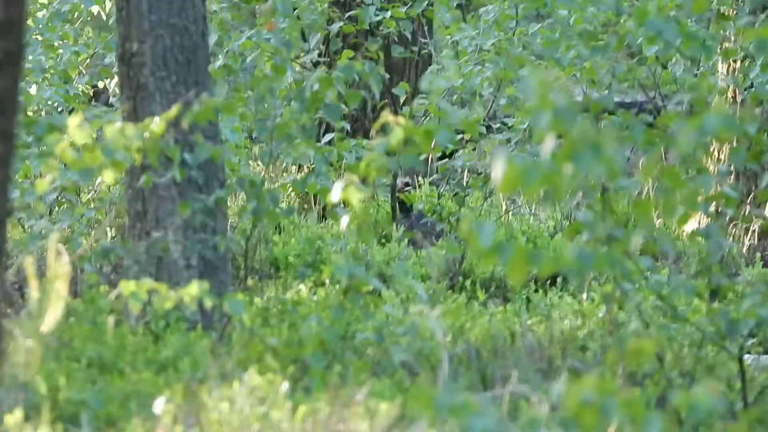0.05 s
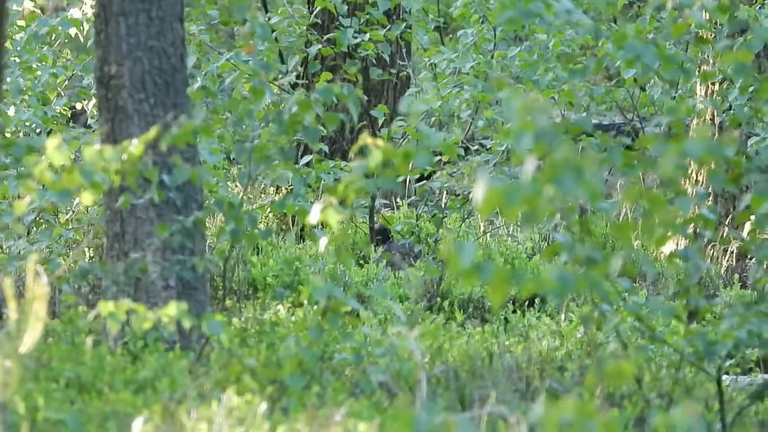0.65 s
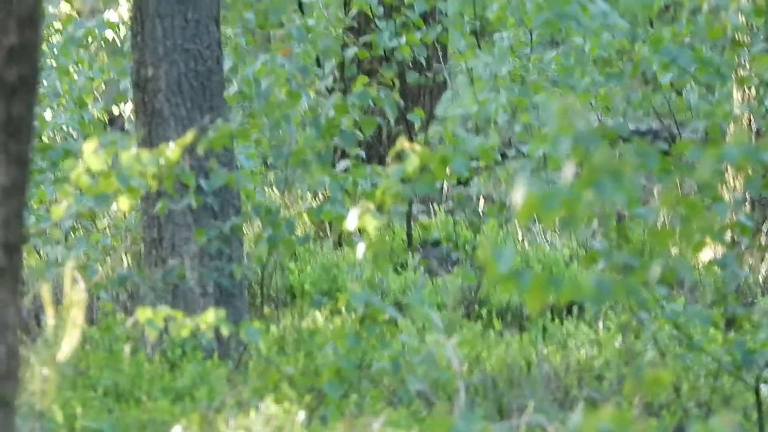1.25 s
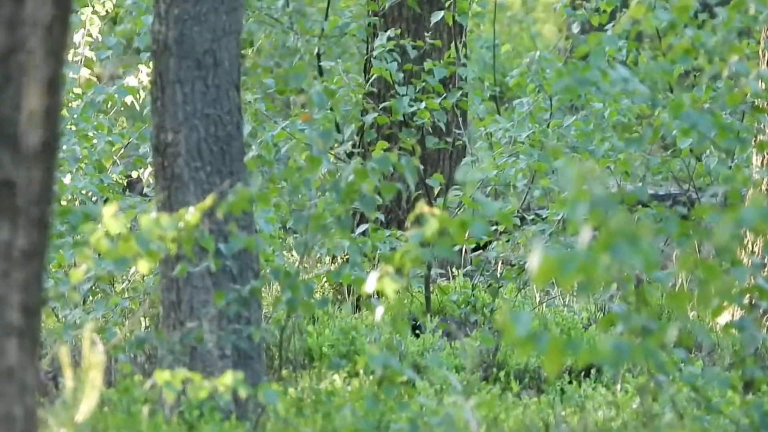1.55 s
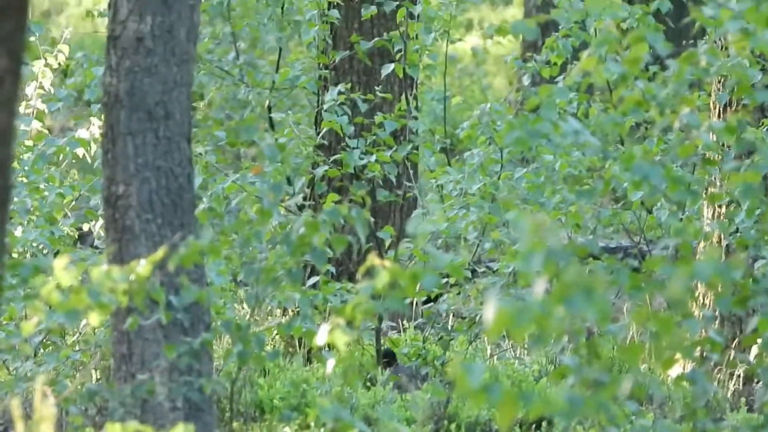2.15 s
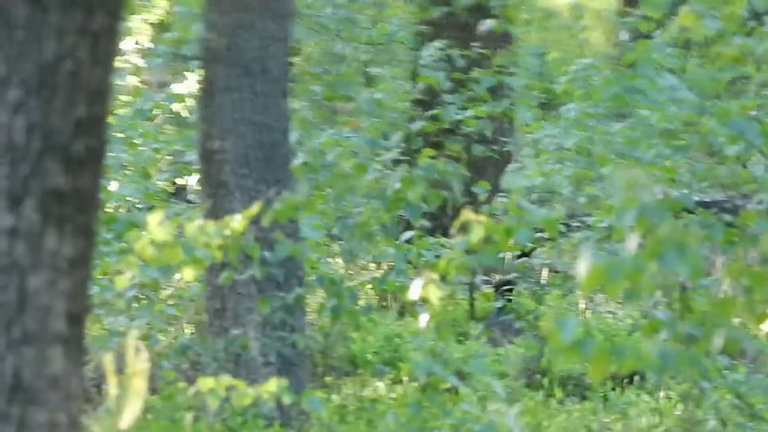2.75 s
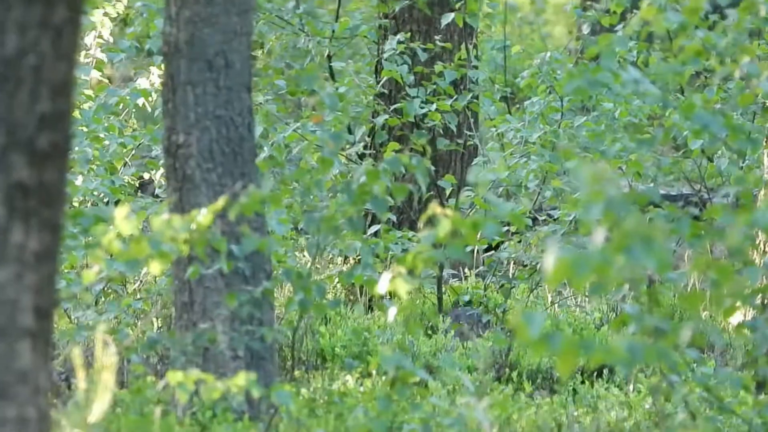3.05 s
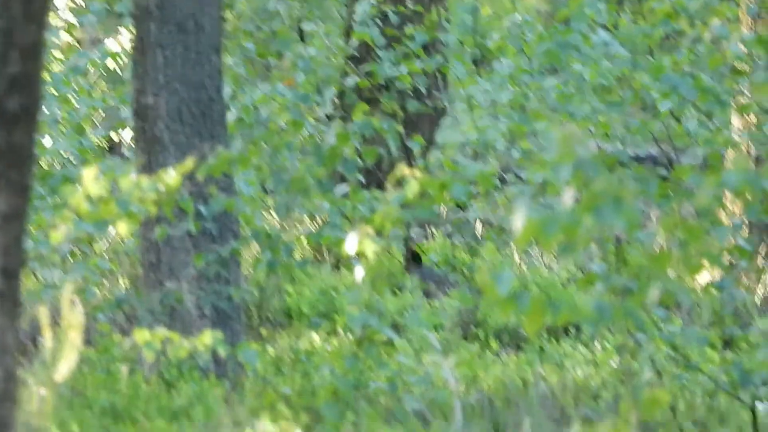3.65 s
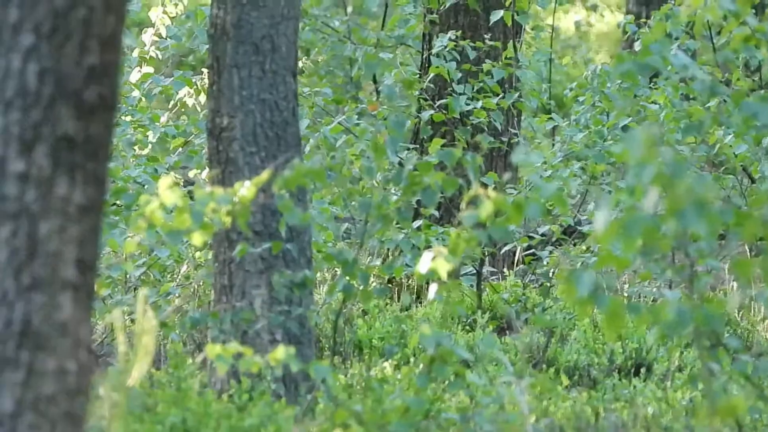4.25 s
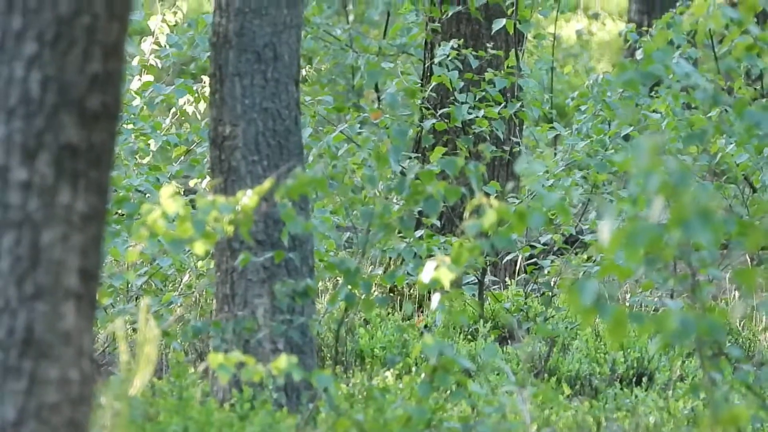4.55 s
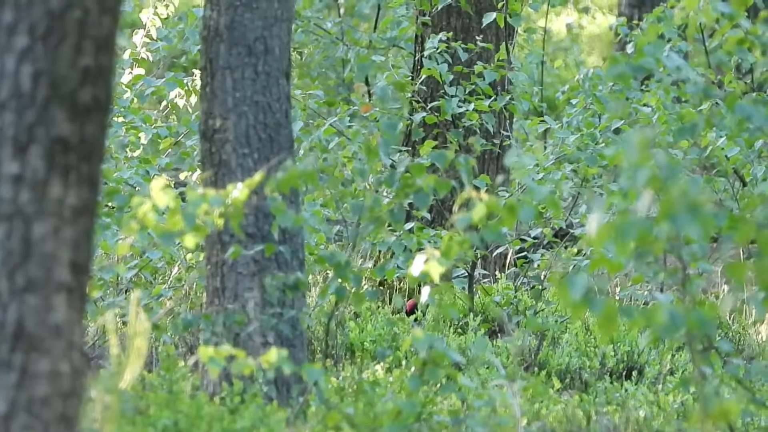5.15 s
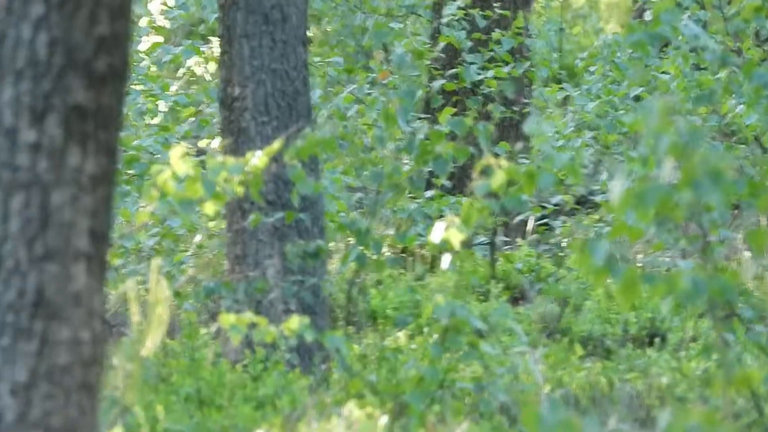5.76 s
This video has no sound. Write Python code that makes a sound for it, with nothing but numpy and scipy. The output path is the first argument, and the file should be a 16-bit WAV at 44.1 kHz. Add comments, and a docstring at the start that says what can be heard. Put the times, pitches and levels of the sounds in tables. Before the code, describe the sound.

In a leafy wood, a warbler sings a quick tumbling song over a faint rush of wind, joined by a two-note whistler and a thin high singer. Midway, fingers click and rub on the hand-held camera, right at its stereo microphone. The sound drops out for half a second, then returns with soft knocks, more clicks, a faint lens motor whirr and a few fainter bird calls.

```python
"""A warbler's tumbling song in a leafy wood, picked up by the stereo microphone of a hand-held camera.
Around it are a two-note whistler, a thin high singer, a rising call and notes from deep in the wood:
nearly pure syrinx tones, scattered by leaves and trunks, over a far rush of wind. Right at the microphone,
fingers click, knock and rub on the camera body. The sound drops out for half a second and returns
with a small motor whirring in the lens."""
import sys
import numpy as np
from scipy import signal
from scipy.fft import rfft, irfft
from scipy.io import wavfile
from scipy.ndimage import uniform_filter1d, map_coordinates

SR = 44100
rng = np.random.default_rng(int(sys.argv[2]) if len(sys.argv) > 2 else 0)


def waveform_to_disk(signal):
    """Save audio, clipped to [-1, 1], as 16-bit WAV at the path in sys.argv[1]."""
    frames = np.transpose(np.atleast_2d(signal))
    scaled = np.clip(frames, -1, 1) * 32767
    samples = np.round(scaled).astype(np.int16)
    wavfile.write(sys.argv[1], SR, samples)


N = 255780
TIME = np.arange(N) / SR
DROPOUT_S = (3.585, 4.115)


def undb(db):
    """Decibels to gain."""
    return 10 ** (np.asarray(db) / 20)


def unit(x):
    """Scale to rms 1."""
    return x / np.sqrt(np.mean(x ** 2) + 1e-30)


def curve(rows):
    """Rows of (t/s, value) joined by straight lines."""
    return np.interp(TIME, *np.transpose(rows))


def add(out, s, x):
    """Mix x into out from time s."""
    i = max(int(s * SR), 0)
    out[i:i + len(x)] += x[:max(N - i, 0)]


def freqs(x):
    """The frequencies of the spectrum of x."""
    return np.arange(x.shape[-1] // 2 + 1) * SR / x.shape[-1] + 1e-3


def on_log(f, points):
    """Rows of (f/Hz, value) joined on a log-frequency axis."""
    hz, value = np.transpose(points)
    return np.interp(np.log(f), np.log(hz), value)


def butter(x, order, hz, kind="low"):
    """Pass x through a Butterworth filter."""
    return signal.sosfilt(signal.butter(order, hz, kind, fs=SR, output="sos"), x)


def resonate(x, modes, order=1):
    """Parallel resonances (f/Hz, width/Hz, level/dB); order 2 has steeper skirts."""
    f = freqs(x)
    response = sum(undb(db) / (1 + 1j * (f * f - hz * hz) / (f * width)) ** order
                   for hz, width, db in modes)
    return irfft(rfft(x) * response, x.shape[-1])


def walk(rate):
    """A random drift: levels held for 1 / rate s and smoothed twice."""
    hold = int(SR / rate)
    steps = np.repeat(rng.standard_normal(N // hold + 1), hold)
    return unit(uniform_filter1d(uniform_filter1d(steps, hold), hold)[:N])


def bend(length_s, values):
    """A smooth line through a few evenly spaced values."""
    shape = np.polyfit(np.linspace(0, 1, len(values)), values, len(values) - 1)
    return np.polyval(shape, np.linspace(0, 1, int(length_s * SR)))


def ports(x, pan_db, lag_ms):
    """The two microphone ports: the left is louder by pan_db and earlier by lag_ms."""
    taps = np.arange(-8, 9)
    delay = np.sinc(taps - lag_ms * SR / 1000) * signal.windows.tukey(len(taps))
    return np.array([x * undb(pan_db / 2), np.convolve(x, delay, "same") * undb(-pan_db / 2)])


def spread_noise(side_db):
    """Stereo noise: a common part plus an opposed part."""
    mid, side = rng.standard_normal((2, N))
    return mid + undb(side_db) * np.array([side, -side])


# Spectrum of the far wind, before and after the dropout: f/Hz, relative level/dB
EARLY_WIND = [(30, -9), (110, -27), (190, -12), (240, -11.5), (350, -6), (600, -5.5), (800, -4.5),
              (950, -9), (1600, -14), (2400, -15), (3900, -17), (5700, -12.5), (7500, -19.5), (9500, -35),
              (11500, -60), (15000, -60)]
LATE_WIND = [(30, -7), (110, -13.5), (190, -8), (330, 1.5), (600, -1.5), (1000, -5.5), (2200, -1),
             (2700, -8), (3400, -4.5), (4800, -10), (7000, -20), (8500, -32.5), (10500, -82)]
# How alike the wind is at the two ports: f/Hz, correlation/0-1
WIND_LIKENESS = [(150, .6), (500, 0.81), (1000, 0.82), (2000, 0.32), (4000, 0.093), (10000, 0.1)]

def far_wind(spectrum, level_db=-55.5):
    """Wind in distant leaves: the bass is alike at both ports, the hiss is wide."""
    mid, side = rfft(rng.standard_normal((2, N)))
    f = freqs(TIME)
    alike = on_log(f, WIND_LIKENESS)
    pair = mid * np.sqrt(1 + alike) + np.array([side, -side]) * np.sqrt(1 - alike)
    return unit(irfft(pair * undb(on_log(f, spectrum)), N)) * undb(level_db)


# Resonances of the lens motor: f/Hz, width/Hz, level/dB
MOTOR_MODES = [(594, 89, -3), (721, 140, 3.5), (854, 95, 2.5), (1328, 111, 5), (1663, 125, 5.5),
               (1950, 300, -3), (3400, 70, -18.5), (4470, 100, -12.5)]
# Its loudness at the microphone: t/s, level/dB
MOTOR_LOUDNESS = [(4.1, -49), (4.5, -48.5), (4.9, -50), (5.15, -54), (5.45, -50), (5.8, -51.5)]

def lens_motor(wander=0.011, hum_hz=848, hum_db=-63.5):
    """Beside the microphone: a faint hum and, after the dropout, a grainy whirr that wanders in pitch."""
    grains = spread_noise(side_db=-11.5) * undb(2 * walk(80))
    steady = unit(resonate(grains, MOTOR_MODES, order=2))
    position = np.cumsum(1 + wander * walk(9))
    whirr = np.array([map_coordinates(channel, [position], mode="mirror") for channel in steady])
    running = TIME > np.mean(DROPOUT_S)
    whirr *= undb(curve(MOTOR_LOUDNESS)) * running * undb([[1.3], [-1.3]])
    hum = unit(resonate(spread_noise(side_db=-20), [(hum_hz, 27, 0)], order=2))
    return whirr + undb(hum_db) * hum


def stroke(s, swell_s, fade_s, db):
    """A finger's pressure: a smooth swell to a peak at time s, and a fade."""
    return undb(db) * np.exp(-((TIME - s) / np.where(TIME < s, swell_s, fade_s)) ** 2)


# Resonances of the body that holds the microphone, rubbed or clicked: f/Hz, width/Hz, level/dB
BODY_MODES = [(820, 390, -2.5), (1450, 56, 2.5), (1680, 400, 1.5), (1950, 180, 0), (2250, 77, -2),
              (3140, 580, -7.5), (4163, 120, -2.5), (5400, 370, -4.5), (6670, 230, -10.5),
              (9600, 2500, -26)]
HOUSING_HZ = 607
# Finger strokes on the body: peak t/s, swell/s, fade/s, level/dB
FINGER_STROKES = [(2.28, 0.064, 0.11, -55.5), (2.53, 0.087, 0.091, -50.5), (2.605, 0.042, 0.02, -52.5),
                  (2.652, 0.015, 0.028, -50.5), (2.73, 0.086, 0.17, -55.5), (3.44, 0.071, 0.096, -52.5),
                  (4.45, 0.13, 0.091, -54), (5.59, 0.1, 0.039, -52)]

def rubbing():
    """Soft skin drags unevenly over body and housing, and once brushes past with a scrape and a hiss."""
    skin, catch = spread_noise(side_db=-5.5), walk(120)
    drag = butter(skin * undb(4 * catch), 4, 4200)
    rub = unit(resonate(drag, BODY_MODES + [(HOUSING_HZ, 110, 9), (730, 120, 3)], order=2))
    pressure = sum(stroke(*row) for row in FINGER_STROKES)
    glide = skin * undb(2.5 * catch)
    hiss = unit(resonate(glide, [(10700, 4200, 0)], order=2))
    scrape = unit(resonate(glide, [(3460, 900, 0)], order=2))
    brush = (hiss + undb(14) * scrape) * stroke(5.695, swell_s=0.045, fade_s=0.04, db=-69)
    return rub * pressure + brush


# Soft knocks on the housing, right at the microphone: t/s, level/dB, push/ms
FINGER_KNOCKS = [(2.541, -51, 3.3), (2.558, -41.5, 1.6), (2.571, -45, 1.6), (2.861, -40, 4.1),
                 (3.461, -43.5, 3.7), (4.192, -45, 1.42), (4.251, -28, 1.1), (4.308, -27.5, 1.16),
                 (4.372, -38.5, 1.3), (4.44, -37.5, 1.3), (4.5836, -41, 1.6), (4.673, -43, 1.4),
                 (4.8582, -38.5, 1.6), (5.489, -36, 9.7)]

def knocks(housing_ring_s=0.0058, shell_hz=340, shell_db=-20, shell_ring_s=0.028, detune=0.055):
    """A finger's push builds up the housing's low note, which dies quickly; the shell rings on, lower."""
    out, t = np.zeros(N), np.arange(8192) / SR
    for s, db, push_ms in FINGER_KNOCKS:
        push_s = push_ms / 1000
        build = 1 - np.exp(-(t / push_s) ** 2)
        swell = build * np.exp(-t / (housing_ring_s + push_s / 2))
        hz = HOUSING_HZ * (1 + detune * rng.standard_normal())
        housing = swell / swell.max() * np.sin(2 * np.pi * hz * t)
        shell = undb(shell_db) * build * np.exp(-t / shell_ring_s) * np.sin(2 * np.pi * shell_hz * t)
        add(out, s, undb(db) * np.sqrt(2) * (housing + shell))
    return ports(out, pan_db=2.0, lag_ms=0.01)


# Plastic clicking by the ports: t/s, level/dB, treble limit f/Hz, rattle decay/ms, snapping part f/Hz
PLASTIC_CLICKS = [(.597, -47, 3200, 4.4, 1510), (0.634, -47, 4200, 4.9, 1500), (.661, -50, 3200, 11, 1720),
                  (1.101, -54, 2400, 1.7, 1400), (1.408, -54, 2400, 1.6, 1390),
                  (1.57, -67, 2400, 1.4, 1380), (2.041, -51, 4500, 0.99, 2000),
                  (2.267, -46, 4500, 8.1, 1900), (2.469, -50, 2400, 6.1, 1800),
                  (2.483, -42.5, 2000, 6.2, 1250), (2.517, -61, 2600, 3.9, 1800),
                  (2.5517, -41.5, 3000, 1.3, 1920), (2.5866, -26.5, 7000, 5.5, 3660),
                  (2.598, -25.5, 6500, 2.6, 1940), (2.6038, -23.5, 10500, 1.3, 4260),
                  (2.607, -20.5, 8940, 3.8, 1477), (2.6124, -22.5, 8000, 2.4, 1950),
                  (2.6169, -25.5, 8000, 5.2, 2000), (2.6202, -34, 4800, 2.8, 2000),
                  (2.654, -41, 2600, 5, 1450), (2.691, -49, 3000, 3.3, 2000), (2.573, -41.5, 5000, 6, 1950),
                  (2.865, -42, 9500, 5.1, 6450), (3.117, -48.5, 2800, 2.8, 1880),
                  (3.3413, -34, 8000, 2.2, 2300), (3.396, -48.5, 3000, 4, 1900),
                  (3.458, -42, 3000, 3.8, 2010), (3.507, -53, 3000, 3.1, 1400),
                  (3.5694, -40.5, 3500, 6, 1950), (4.252, -29, 3700, 3.9, 1250),
                  (4.309, -34.5, 3500, 4.5, 2060), (4.384, -47, 4000, 5.7, 1990),
                  (4.419, -37, 4600, 3.9, 2000), (4.469, -39, 5000, 2.6, 2100),
                  (4.4761, -43, 5800, 6, 3400), (4.5566, -36, 4900, 3.3, 2660),
                  (5.4708, -37.5, 4200, 6.5, 3030), (5.4902, -30, 5200, 9.5, 1890),
                  (5.682, -41, 4400, 9, 3780), (5.7114, -39.5, 5000, 5, 3200),
                  (5.73, -43.5, 4200, 19, 3280), (5.7456, -37.5, 4700, 1.7, 3100)]

def clicks(grit=0.42, low_cut_hz=520, scuff_db=-18, scuff_ms=3, apart=0.81):
    """A scuff, a snap and a rattle ring the body and the snapping part, differently at each port."""
    out, t = np.zeros((2, N)), np.arange(-1024, 3072) / SR
    for s, db, bright_hz, decay_ms, ring_hz in PLASTIC_CLICKS:
        shared, opposed = rng.standard_normal((2, len(t)))
        noise = shared + apart * np.array([opposed, -opposed])
        slope_ms = np.where(t < 0, scuff_ms, decay_ms)
        envelope = np.where(t < 0, undb(scuff_db), 1) * np.exp(-1000 * abs(t) / slope_ms)
        force = grit * noise * envelope + (t == 0)  # the snap is a single impulse
        ring = resonate(force, BODY_MODES + [(ring_hz, 180, 5)])
        ring = butter(ring, 3, low_cut_hz, "high")
        ring = butter(ring, 6, bright_hz)  # a softer contact is duller
        peak_power = uniform_filter1d(np.mean(ring ** 2, axis=0), size=130).max()
        for channel, part in zip(out, ring):
            add(channel, s + t[0], part * undb(db) / np.sqrt(peak_power))
    return out


# Which side of the microphone the fingers are on: t/s, left over right level/dB
FINGER_SIDE = [(2.6, -2), (3.6, 0), (4.3, 4), (5.5, 5), (5.72, 10)]

def fingers():
    """Clicks and rubbing are louder at the port nearer the hand."""
    side_db = curve(FINGER_SIDE)
    return (clicks() + rubbing()) * undb([side_db / 2, -side_db / 2])


def wood(x, direct_db, scatter_db, pan_db, lag_ms, leaves_db=-9, leaves_s=0.0066, t60_s=0.93):
    """Perch to microphone: the direct path, a spray of echoes off near leaves, a long tail off trunks."""
    t = np.arange(SR) / SR
    leaves = rng.standard_normal((2, SR)) * np.exp(-t / leaves_s)
    trunks = rng.standard_normal((2, SR)) * undb(2 * rng.standard_normal((2, SR)))
    trunks *= np.exp(-np.log(1000) * t / t60_s) * (1 - np.exp(-t / 0.0021))
    echoes = (unit(trunks) + undb(leaves_db) * unit(leaves)) / np.sqrt(SR)
    scattered = signal.fftconvolve(x[None], echoes, axes=1)[:, :N]
    return undb(direct_db) * ports(x, pan_db, lag_ms) + undb(scatter_db) * scattered


def syrinx(hz, overtone_db):
    """A bird's voice: a nearly pure whistle with a faint octave."""
    phase = 2 * np.pi * np.cumsum(hz) / SR
    return np.sqrt(2) * (np.sin(phase) + undb(overtone_db) * np.sin(2 * phase))


def song(notes, waver, edge=0.16, flutter_db=2, overtone_db=-55):
    """Notes (t/s, pitch line f/Hz, level/dB) waver, and swell and fade over the share edge of each."""
    out, wobble = np.zeros(N), walk(300)
    for s, line, db in notes:
        u = np.linspace(0, 1, len(line))
        hz = line * (1 + waver * wobble[int(s * SR):][:len(u)])
        swell = np.sin(np.pi / 2 * np.clip(np.minimum(u, 1 - u) / edge, 0, 1))
        beak = 1 / np.sqrt(1 + (2300 / hz) ** 12)  # a small beak radiates the lowest pitches poorly
        add(out, s, undb(db) * swell * beak * syrinx(hz, overtone_db))
    return out * undb(flutter_db * walk(90))


def trill(hz, swing_hz, per_s, uneven=0.068):
    """The pitch swings about its line, not quite evenly."""
    rate = per_s * (1 + uneven * walk(300)[:len(hz)])
    return hz + swing_hz * np.cos(2 * np.pi * np.cumsum(rate) / SR)


# Notes from deep in the wood: t/s, length/s, start f/Hz, end f/Hz, level/dB
DISTANT_NOTES = [(0.135, 0.02, 5700, 5750, -70), (0.294, 0.012, 5620, 5750, -57),
                 (4.746, 0.15, 5200, 5400, -71.5), (4.881, 0.091, 5050, 2684, -61.5),
                 (4.867, 0.078, 2680, 2530, -61.5), (5.043, 0.032, 5400, 4400, -58.5),
                 (5.212, 0.1, 4780, 4850, -63.5)]

def far_birds():
    """Faint, unsteady glides from the furthest perches."""
    return song([(s, bend(length, hz), db) for s, length, *hz, db in DISTANT_NOTES], waver=0.032)


# Rising calls, right of the microphone: t/s, level/dB, growing time/s
CALLS = [(2.784, -49, 0.12), (4.561, -49.5, 0.2)]

def rising_calls(foot_hz=2852, full_hz=3300, top_hz=4300, top_at_s=0.238, sweep_s=0.0455, hold_s=0.0058):
    """A soft level whistle grows, sweeps up a fifth, thins out and holds the top for a moment."""
    t = np.arange(int((top_at_s + hold_s) * SR)) / SR
    height = np.exp(-(np.maximum(top_at_s - t, 0) / sweep_s) ** 1.6)
    hz = foot_hz + (top_hz - foot_hz) * height
    effort_db = -2.5 * abs(hz - full_hz) / (top_hz - full_hz)
    notes = [(s, hz, db + effort_db + 24 * np.minimum(t / grow_s - 1, 0)) for s, db, grow_s in CALLS]
    return song(notes, edge=0.06, waver=0.0022, flutter_db=1)


# The high singer, left of the microphone. Its thin falling notes and upward ticks: t/s, level/dB
HIGH_FALLS = [(1.237, -42), (2.66, -60), (2.79, -58.5)]
HIGH_TICKS = [(1.067, -54.5), (2.059, -56), (2.195, -54.5), (3.165, -49.5)]
# Its seesaw of lifts and lower humps: t/s, length/s, base f/Hz, top f/Hz, level/dB
SEESAW_LIFTS = [(2.9, 0.044, 5390, 5580, -49), (3.068, 0.048, 4810, 5320, -43),
                (3.243, .047, 4780, 5490, -41)]
SEESAW_HUMPS = [(2.962, .04, 4700, 4750, -53), (3.13, 0.046, 4110, 4566, -42.5),
                (3.301, 0.053, 4050, 4560, -43)]
# The path of its closing scoop: t/s, f/Hz, level/dB
SCOOP_PATH = [(3.405, 4380, -53.5), (3.42, 3930, -51.5), (3.432, 3770, -50.5), (3.453, 4310, -37.5),
              (3.474, 4600, -47.5), (3.492, 5250, -44.5), (3.514, 6100, -50)]

def high_singer(fall_s=0.066, tick_s=0.012, shiver_db=-46):
    """Thin falling notes, the first ending in a shiver, and ticks; then a seesaw that ends in a scoop."""
    notes = [(s, bend(fall_s, (7000, 6110, 5800)), db) for s, db in HIGH_FALLS]
    shiver = trill(bend(0.051, (5400, 6500)), swing_hz=1010, per_s=47)
    notes += [(HIGH_FALLS[0][0] + fall_s, shiver, shiver_db)]
    notes += [(s, bend(tick_s, (4900, 5820, 7100)), db) for s, db in HIGH_TICKS]
    for rows, heights in ((SEESAW_LIFTS, (0.015, 0.45, 0.91, 0.56)), (SEESAW_HUMPS, (0, 0.96, 0.2))):
        notes += [(s, hz + (top_hz - hz) * bend(length, heights), db) for s, length, hz, top_hz, db in rows]
    times, hz, db = np.transpose(SCOOP_PATH)
    t = np.arange(times[0], times[-1], 1 / SR)
    scoop = [(times[0], np.interp(t, times, hz), np.interp(t, times, db))]
    return song(notes, edge=0.25, waver=0.0081, flutter_db=0.5) + song(scoop, edge=0.08, waver=0.008)


# The whistler's pairs, off to the left: t/s, high note's length/s, its start f/Hz, level/dB
WHISTLE_PAIRS = [(1.755, 0.13, 5020, -52), (2.205, 0.16, 5090, -47.5), (2.747, .13, 5254, -47.5)]

def two_note_whistler(low_after_s=0.204, low_length_s=0.094):
    """A long high whistle swells and levels off, answered each time by a shorter low one."""
    high = [(s, bend(length, (hz, 4985, 4950)), db + bend(length, (-3.5, -0.5, 1)))
            for s, length, hz, db in WHISTLE_PAIRS]
    low = [(s + low_after_s, bend(low_length_s, (4090, 4190, 4170)), db) for s, _, _, db in WHISTLE_PAIRS]
    return song(high + low, edge=0.3, waver=0.0067, flutter_db=3, overtone_db=-37)


# The warbler's buzzes: t/s, length/s, start f/Hz, end f/Hz, swing/Hz, level/dB
BUZZES = [(1.53, 0.15, 4545, 4360, 380, -44.5), (1.665, 0.055, 3482, 3400, 330, -41.5),
          (1.99, 0.12, 3700, 3400, 420, -50), (2.075, 0.16, 3198, 2008, 500, -52)]

def warbler_buzzes(swings_per_s=210):
    """Sinking notes whose pitch swings fast enough to buzz."""
    notes = [(s, trill(bend(length, hz), swing_hz, swings_per_s), db)
             for s, length, *hz, swing_hz, db in BUZZES]
    return song(notes, edge=0.11, waver=0.012)


# The warbler's accents: t/s, length/s, start f/Hz, end f/Hz, level/dB
ACCENT_NOTES = [(0.644, 0.019, 4300, 4190, -43.5), (0.95, 0.026, 4224, 3916, -38.5),
                (1.625, .02, 4260, 4235, -47.5), (0.514, 0.014, 2130, 2300, -51.5),
                (0.811, .016, 2160, 2330, -49.5), (1.139, 0.018, 2240, 2140, -53)]

def warbler_accents():
    """Short, soft-edged notes at a nearly level pitch."""
    notes = [(s, bend(length, hz), db) for s, length, *hz, db in ACCENT_NOTES]
    return song(notes, edge=0.39, waver=0.013)


# The warbler's trills: t/s, length/s, start f/Hz, end f/Hz, swing/Hz, swing rate/Hz, end level/dB
TRILLS = [(0.599, 0.044, 4510, 4300, 590, 58, -45), (0.896, 0.072, 4300, 4260, 546, 54, -41),
          (1.48, 0.05, 2500, 2480, 600, 39, -44.5)]

def warbler_trills(growth_db=7):
    """A few wide swings of pitch that grow louder."""
    notes = [(s, trill(bend(length, hz), swing_hz, rate), db + bend(length, (-growth_db, 0)))
             for s, length, *hz, swing_hz, rate, db in TRILLS]
    return song(notes, edge=0.07, waver=0.02)


# The warbler's slurs, down or up: t/s, length/s, start f/Hz, end f/Hz, level/dB
SLUR_NOTES = [(0.11, 0.017, 5710, 4200, -56), (0.264, 0.019, 5720, 4190, -56),
              (0.397, 0.021, 4750, 3420, -50), (0.48, 0.022, 4830, 3440, -49),
              (0.561, 0.022, 4810, 3450, -47.5), (0.631, 0.028, 4796, 3280, -46.5),
              (0.72, 0.025, 4950, 2680, -44.5), (0.803, 0.02, 4860, 3370, -50),
              (0.945, 0.036, 4300, 2250, -46), (1.046, 0.019, 4190, 2500, -42.5),
              (1.115, 0.029, 3477, 2120, -50), (1.224, 0.034, 2377, 4300, -45),
              (1.26, 0.042, 4417, 2135, -45), (1.368, 0.016, 4220, 3560, -48),
              (1.385, 0.037, 2400, 4360, -44.5), (1.424, 0.038, 4600, 2230, -47),
              (1.636, 0.034, 3200, 4427, -41.5), (1.805, 0.097, 4800, 2112, -42.5)]

def warbler_slurs(tip_share=0.36, tip_time_share=0.15, bow=1.1, db_per_octave=3.5):
    """Thin slides between two pitches, steepest and loudest at the high tip."""
    notes = []
    for s, length, start_hz, end_hz, db in SLUR_NOTES:
        u = np.linspace(0, 1, int(length * SR))
        height = tip_share * np.exp(-u / tip_time_share) + (1 - tip_share) * (1 - u) ** bow
        low, high = sorted((start_hz, end_hz))
        fall = low + (high - low) * height
        hz = fall if start_hz > end_hz else fall[::-1]
        notes.append((s, hz, db + db_per_octave * np.log2(hz / high)))
    return song(notes, edge=0.07, waver=0.02)


# The warbler's arches: t/s, top f/Hz, drop/s, level/dB
ARCH_NOTES = [(0.445, 3460, 0.011, -46), (0.747, 3620, 0.018, -36), (1.063, 3562, 0.018, -33.5)]

def warbler_arches(foot_hz=2050, climb_s=0.042, db_per_octave=21):
    """Each climbs to a rounded top, where it is loudest, and drops ever faster."""
    notes = []
    for s, top_hz, drop_s, db in ARCH_NOTES:
        height = np.concatenate([bend(climb_s, (0.356, 0.76, 1)), bend(drop_s, (1, 0.8, 0))])
        hz = foot_hz + (top_hz - foot_hz) * uniform_filter1d(height, size=300)
        notes.append((s, hz, db + db_per_octave * np.log2(hz / hz.max())))
    return song(notes, edge=0.1, waver=0.023)


def birds():
    """Every bird from its own perch, the warbler nearly ahead; the further off, the more is echo."""
    far = far_birds()
    warbler = warbler_slurs() + warbler_arches() + warbler_trills() + warbler_accents()
    return (wood(warbler, direct_db=-1, scatter_db=-2.5, pan_db=-0.5, lag_ms=0.057,
                 leaves_db=-6, leaves_s=0.035)
            + wood(warbler_buzzes(), direct_db=-2.5, scatter_db=-3, pan_db=-2, lag_ms=0.042,
                   leaves_db=-1.5, leaves_s=0.0095)
            + wood(two_note_whistler(), direct_db=-1.5, scatter_db=-4.5, pan_db=3.5, lag_ms=0.021)
            + wood(high_singer(), direct_db=-1, scatter_db=-7.5, pan_db=3, lag_ms=0.057,
                   leaves_db=1.5, leaves_s=0.035)
            + wood(rising_calls(), direct_db=3, scatter_db=-0.5, pan_db=-4, lag_ms=0.057)
            + wood(far, direct_db=-4, scatter_db=0, pan_db=-9, lag_ms=0.033))


def scene():
    """Wind far off, birds among the trees, and the camera's own sounds at the microphone."""
    wind = np.where(TIME < np.mean(DROPOUT_S), far_wind(EARLY_WIND), far_wind(LATE_WIND))
    return wind + birds() + fingers() + knocks() + lens_motor()


def record(dry, low_cut_hz=158, leak_db=-32, mic_hz=13500, fade_s=0.024, top_hz=15500):
    """A wind filter takes most of the bass, the treble rolls off, the sound drops out, the top is cut."""
    thinned = butter(dry, 7, low_cut_hz, "high") + undb(leak_db) * dry
    dulled = butter(thinned, 3, mic_hz)
    outside_s = np.maximum(DROPOUT_S[0] - TIME, TIME - DROPOUT_S[1])
    live = np.clip(outside_s / fade_s + 0.5, 0, 1)
    return signal.sosfilt(signal.ellip(8, 0.2, 70, top_hz, fs=SR, output="sos"), dulled * live)


dry = scene()
out = record(dry)
waveform_to_disk(out)
```